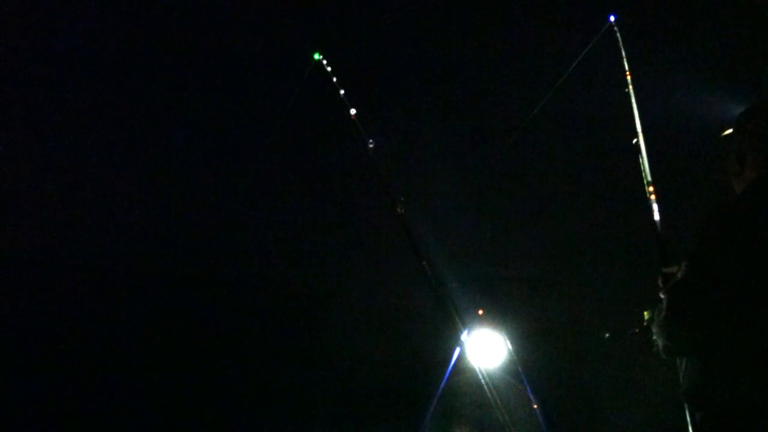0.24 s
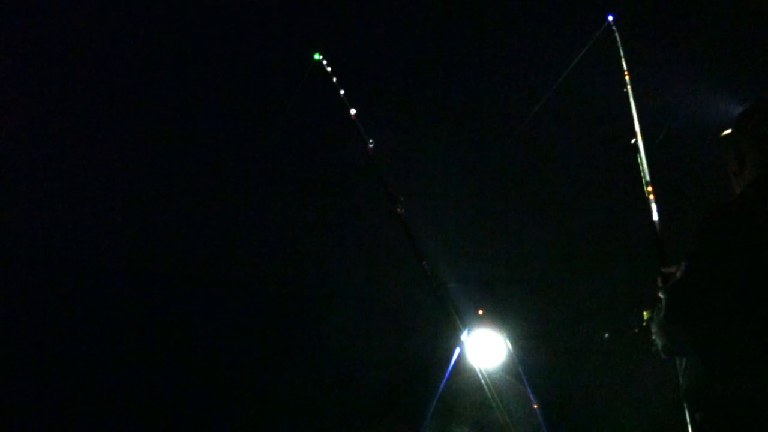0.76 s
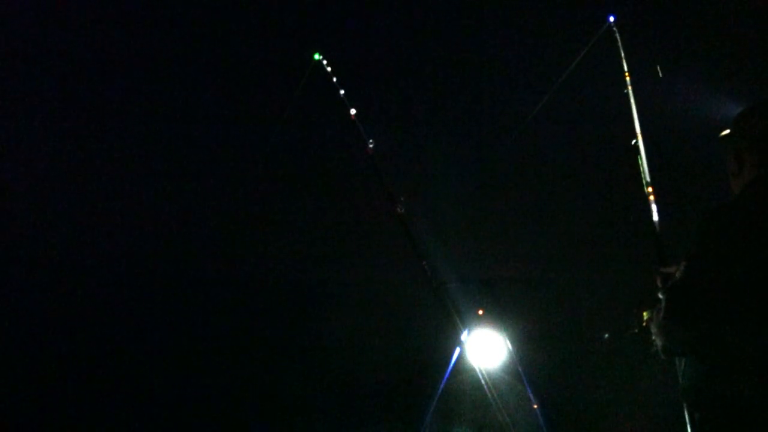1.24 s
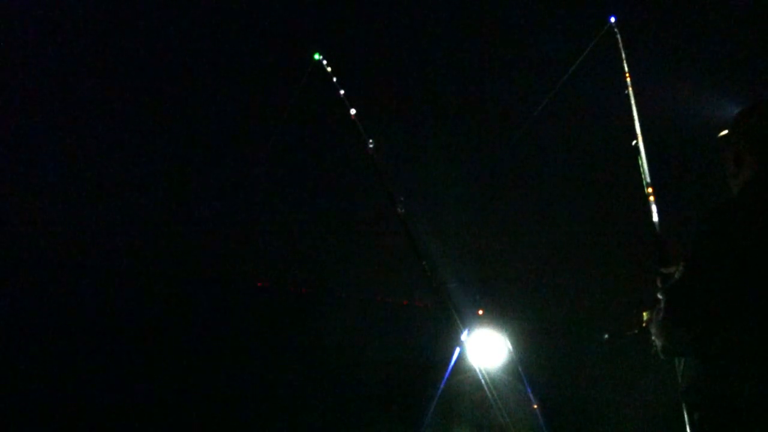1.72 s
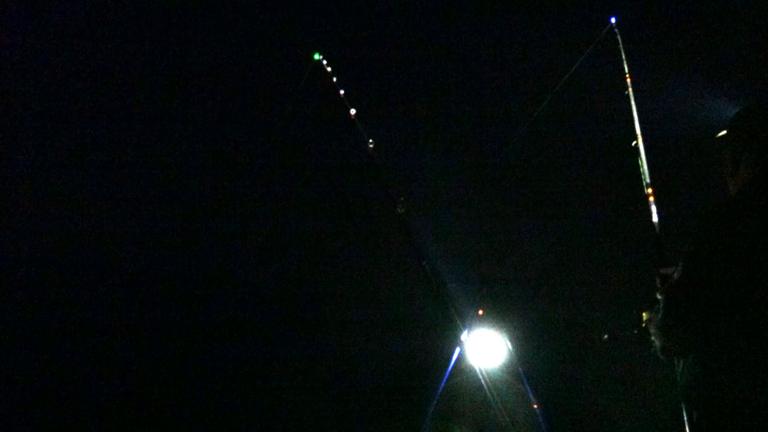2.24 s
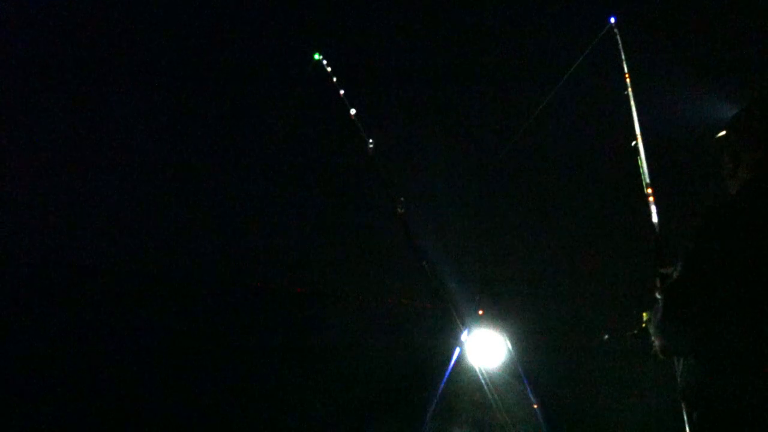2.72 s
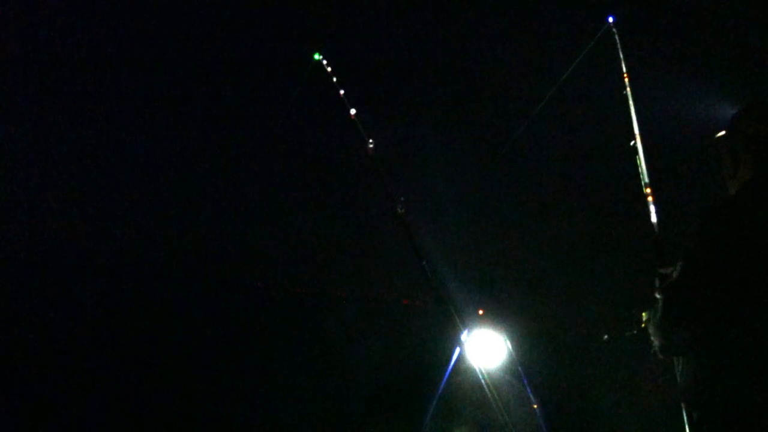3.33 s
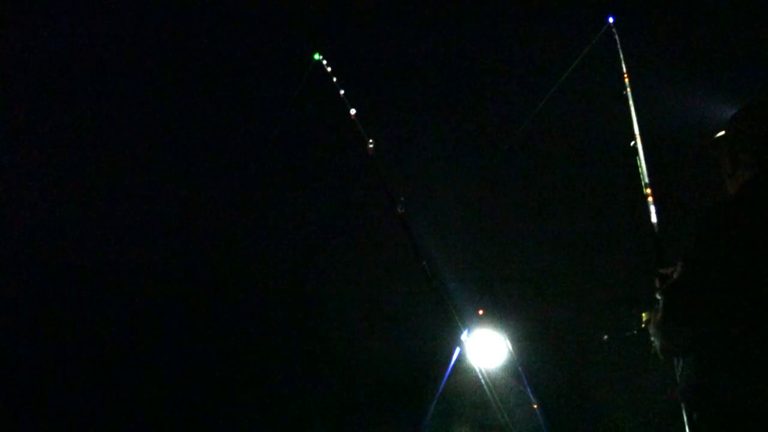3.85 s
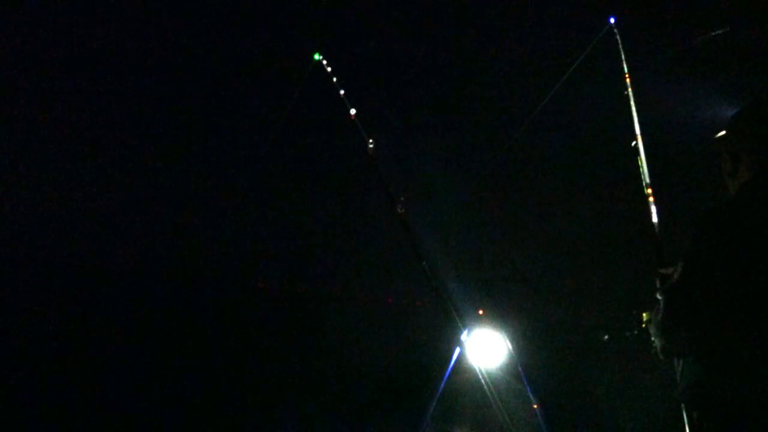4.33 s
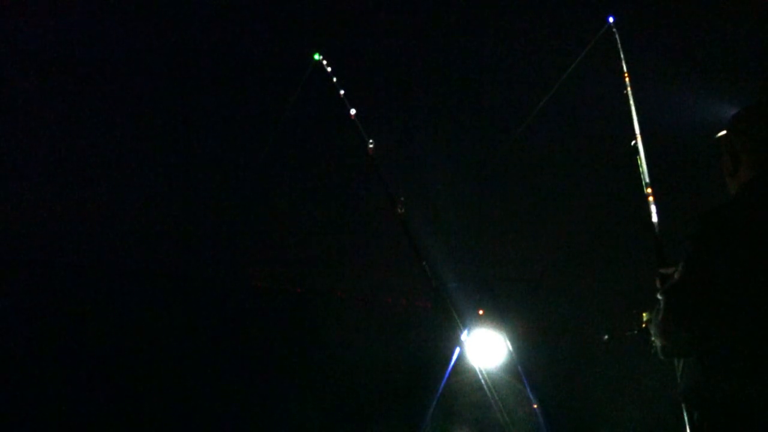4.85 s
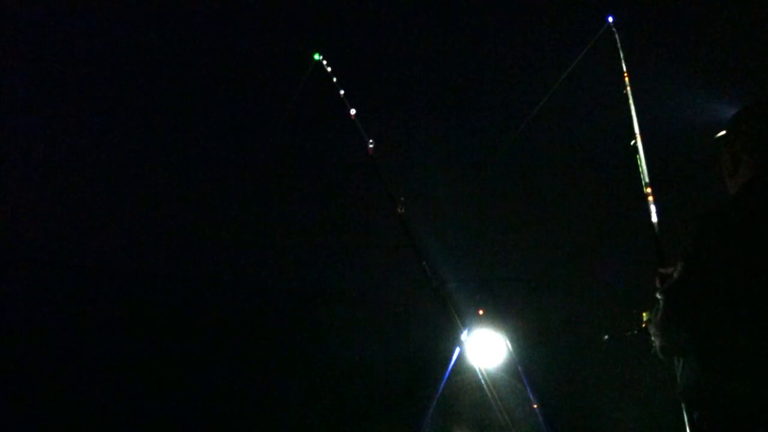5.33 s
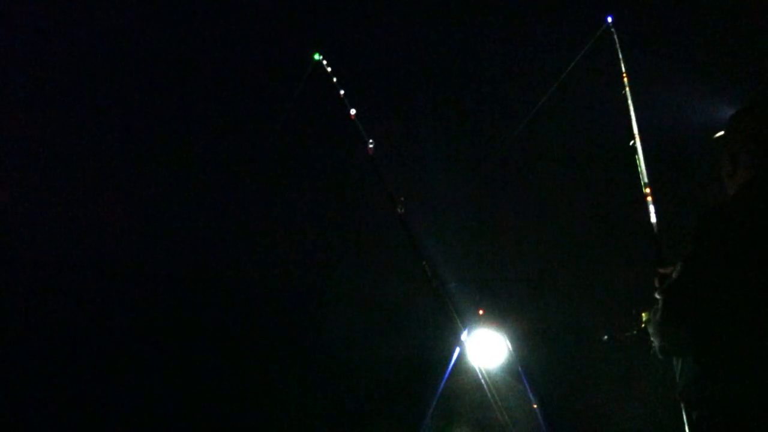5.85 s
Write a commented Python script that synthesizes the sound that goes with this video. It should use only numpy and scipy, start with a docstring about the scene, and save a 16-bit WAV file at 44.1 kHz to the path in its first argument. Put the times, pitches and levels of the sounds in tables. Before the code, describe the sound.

A small wave breaks and foams up a pebble beach. The water sinks away with dull gurgles, then drains back while stones rattle and clack together. A second wave plunges with a low boom and a burst of spray, and its foam fades to a soft wash. The shore is heard on the left only, with a very faint electronic hiss and whine on both sides.

```python
"""Small waves on a pebble beach at night.

One wave breaks, foams up the beach and drains back through rattling pebbles; the next plunges with a
boom and a burst of spray. Trapped air makes the booms, ringing bubbles the foam, and colliding stones
the rattle. The shore is heard on the left only; a faint electronic hiss and whine fill both sides."""
import sys
import numpy as np
from scipy import signal
from scipy.fft import rfft, irfft, next_fast_len
from scipy.io import wavfile
from scipy.ndimage import uniform_filter1d, map_coordinates

SR = 44100
rng = np.random.default_rng(int(sys.argv[2]) if len(sys.argv) > 2 else 0)


def generate_wav(sig):
    """Save sig (samples, or channels by samples) to the path in sys.argv[1] as 16-bit PCM at SR."""
    pcm = np.round(np.clip(np.atleast_2d(sig).T, -1, 1) * 32767).astype(np.int16)
    wavfile.write(sys.argv[1], SR, pcm)


N = 268111

# The tone of each noise, from low to high: frequency_hz, relative_level_db
BOOM_TONE = [(20, -32), (55, -27), (90, -22.5), (135, -3.5), (190, -0.5), (280, -1.5), (450, -22),
             (900, -70)]
CHURN_TONE = [(70, -45), (150, -17), (240, -7), (330, -1.5), (430, .5), (590, 0.5), (800, 1.5),
              (1400, -18.5), (4000, -70)]
FOAM_TONE = [(200, -5.5), (600, 1.5), (800, -3.5), (980, -2), (1150, -3.5), (1380, -5.5), (1600, -9.3),
             (2100, -12.5), (2800, -17), (5000, -43), (8000, -58), (13000, -68), (16000, -79)]
PEBBLE_TONE = [(400, -13.5), (1400, 5), (1900, -2.5), (2500, -1), (2900, -2.5), (3500, 1.7), (4100, -2.5),
               (4800, -13), (5800, -8), (6600, -9), (8000, -17), (11000, -46), (16000, -58)]
GRAVEL_TONE = [(400, -28), (1300, 1.5), (2400, -4), (3400, -13), (4600, -5), (5600, -1.5), (6600, -5),
               (8000, -20), (11000, -38), (16000, -52)]
COVERED_STONE_TONE = [(500, -29.5), (1200, 0), (1900, 0), (2600, 2), (3700, -2), (4900, -9.5),
                      (5700, -11.5), (6600, -21.5), (8000, -30.5), (11000, -50), (16000, -56)]
SPRAY_TONE = [(1500, -28), (4000, 7), (6000, 2), (7700, -1), (9000, -6), (10500, -12), (12200, -15),
              (14000, -22), (16000, -30)]
RUMBLE_TONE = [(20, -29), (50, -20), (66, 1.5), (100, 7.5), (150, 4.5), (300, -32), (600, -84)]
HISS_TONE = [(20, 29), (60, 15.5), (130, 10), (350, 6), (1000, 3.5), (8000, 1), (16000, -0.5)]
SLOSH_TONE = [(50, -40), (110, -18), (160, -2), (220, -1), (450, -5), (900, -35), (3000, -90)]
TRICKLE_TONE = [(800, -28), (1400, 3), (2300, 1.5), (3400, -9), (4500, -4), (5600, 0.5), (6300, -2),
                (8000, -11), (11000, -21), (16000, -45)]
SPLASH_TONE = [(700, -20), (2000, -3), (4200, 0), (5500, -4), (8000, -9), (11000, -17), (16000, -32)]

# The names of the five parts of a wave's sound: boom, churn, foam, shingle (rolling stones), spray
WAVE_PARTS = ("boom", "churn", "foam", "shingle", "spray")
# Steady surf farther along the shore, by part: level_db
DISTANT_SURF = {"boom": -78, "churn": -79, "foam": -60.5, "shingle": -79, "spray": -85.5}
# Waves breaking: start_s, boom_db, churn_db, foam_db, shingle_db, spray_db
BREAKING_WAVES = [(-0.3, -62, -42, -35, -44.5, -63), (4.124, -50.5, -32.7, -33.7, -41.3, -50)]
# How each part swells and dies when a wave breaks: attack_s, hold_s, fade_s
BREAK_TIMING = {"boom": (0.39, 0.21, 0.67), "churn": (0.34, 0.17, 0.39), "foam": (0.33, .14, 0.5),
                "shingle": (0.19, 0.32, .35), "spray": (0.15, 0.25, 0.49)}
# Water running up the beach after a break: start_s, run_up_s, churn_db, foam_db, shingle_db, spray_db
RUN_UPS = [(-0.08, .5, -51.5, -30.2, -42, -62.5), (5.05, 0.14, -61.5, -50.3, -59, -76),
           (5.29, .085, -68, -55.5, -56.5, -81)]
# How each part follows that water, timed in run-ups: hold_run_ups, fall_db_per_run_up
RUN_UP_TIMING = {"churn": (0.73, 9.2), "foam": (0.72, 6.9), "shingle": (1.28, 5.28), "spray": (2.1, 4.1)}
# Big bubbles burst first, so the foam's lowest pitch climbs as a wave ages: time_s, pitch_hz
FOAM_LOWEST_PITCH = [(0, 534), (1.4, 823), (2.6, 840), (3.8, 616), (4.5, 407), (6.08, 494)]
# Moving stones are coarse under breaking and draining water, fine under run-ups: time_s, coarse_share
STONE_MIX = [(0, 1), (1.3, 0.3), (2.2, .6), (2.6, 0.45), (3, 0.85), (4.6, 0.9), (5, 0), (6.08, 0.65)]
# Big air pockets gulping: start_s, level_db, pitch_hz
AIR_GULPS = [(.045, -42, 250), (.112, -40, 280), (1.015, -54, 380), (1.196, -51, 195), (1.265, -54, 214),
             (1.422, -48, 280), (1.448, -44.5, 165), (1.448, -42.5, 476), (1.526, -47.5, 180),
             (1.575, -49, 260), (1.598, -39.5, 210), (1.712, -50, 181), (1.79, -53, 234), (1.975, -51, 385),
             (2.2, -53, 335), (2.25, -54, 275)]
# Single stones knocking together: start_s, level_db, pitch_hz
STONE_KNOCKS = [(.6945, -26, 2070), (1.171, -25.5, 1720), (1.371, -27, 2200), (1.6645, -31, 1850),
                (1.9465, -38, 5200), (2.0965, -39, 2710), (2.115, -43, 5400), (2.218, -40.5, 4500),
                (2.2915, -40, 3020), (2.4662, -39, 5300), (2.485, -39, 1060), (2.531, -42, 5500),
                (2.546, -40, 960), (2.688, -33.5, 1700), (2.7475, -40, 4400), (2.753, -39, 4430),
                (2.860, -38, 2800), (2.978, -40, 4230), (2.991, -36, 3400), (3.024, -30.5, 2900),
                (3.078, -33.5, 3000), (3.095, -34, 4400), (3.125, -32, 2200), (3.234, -37, 1640),
                (3.275, -31, 3320), (3.313, -40, 4300), (3.392, -35, 3100), (3.466, -40, 5300),
                (3.5175, -36, 2370), (3.7533, -31.5, 2280), (3.887, -36, 1640), (3.9235, -34, 1680),
                (3.980, -37, 1890), (4.0128, -36, 3440), (5.860, -48, 4100), (5.915, -49, 5620),
                (5.9285, -46.5, 4200), (5.986, -51, 5200), (6.015, -50, 5500)]
# Fine gravel trickling after the first run-up: start_s, attack_s, hold_s, fall_db_per_s, level_db
GRAVEL_TRICKLE = (1.07, .5, 0.34, 9, -57.5)
# Spent water gurgling down between the stones, by part: attack_s, hold_s, fall_db_per_s, level_db
SINKING_GURGLE = {"boom": (0.25, 0.27, 83, -66), "churn": (0.2, 0.42, 27, -51.5)}
# Banks of pebbles giving way: start_s, hold_s, level_db
PEBBLE_SLIDES = [(2.11, .06, -59), (2.27, .03, -60), (2.43, .09, -60), (2.68, 0.1, -56.5),
                 (2.84, .05, -58.5), (2.965, 0.14, -55.5), (3.242, 0.33, -53.3), (3.6, 0.2, -55),
                 (3.81, .19, -55), (4.183, 0.18, -46)]
# The backwash (water draining back to sea) gathering speed, by part: level_db, growth_db_per_s
BACKWASH_LEVELS = {"boom": (-67, 1.6), "churn": (-60.5, 7.8), "foam": (-55.5, 4.6), "shingle": (-54.3, 0.6),
                   "spray": (-68.5, 3.3)}
# Sheets of water thrown on the stones by the curling crest: start_s, level_db
WATER_SHEETS = [(4.118, -56), (4.168, -53.5), (4.222, -49), (4.272, -45), (4.328, -45), (4.392, -45.5),
                (4.752, -53)]
# The second wave curls into a tube, whose boom sinks as it swallows more air: time_s, pitch_hz
TUBE_GLIDE = [(4.2, 220), (4.26, 190), (4.305, 141), (4.35, 85), (4.45, 78)]
# The thud and the boom of that tube caving in: attack_s, hold_s, fade_s, level_db
TUBE_COLLAPSE = {"thud": (0.04, 0.11, 0.42, -53.5), "boom": (0.03, 0.1, 0.08, -48)}
# Lumps of water slapping down in the foam: start_s, hold_s, level_db
WATER_SLAPS = [(4.295, .05, -37.5), (4.372, .045, -33), (4.886, .02, -40.5)]

GURGLE_START_S, COLLAPSE_START_S = 1.32, 4.255
BACKWASH_START_S, BACKWASH_ATTACK_S, BACKWASH_HOLD_S = 2.67, 0.24, 1.33
TOP_HZ = 15700


def amp(db):
    """Turn decibels into a gain to multiply by."""
    return 10 ** (np.asarray(db) / 20)


def unit(x):
    """Scale a signal to an average power of 1."""
    return x / np.sqrt(np.mean(x ** 2) + 1e-20)


def curve(points):
    """Join (time_s, value) points with straight lines, one value per sample."""
    return np.interp(np.arange(N) / SR, *np.transpose(points))


def wobble(rate):
    """A smooth curve through `rate` random values a second."""
    return map_coordinates(rng.standard_normal(int(N * rate / SR) + 4), [np.arange(N) * rate / SR])


def filtered(x, response):
    """Scale each frequency in x by response(hz)."""
    size = next_fast_len(N + 8192)
    return irfft(rfft(x, size) * response(np.fft.rfftfreq(size, 1 / SR)), size)[..., :N]


def coloured(x, tone):
    """Shape x with a tone table and scale it to a power of 1."""
    points_hz, db = np.transpose(tone)
    return unit(filtered(x, lambda hz: amp(np.interp(np.log(hz + 1), np.log(points_hz + 1), db))))


def rush(patchy_db):
    """White noise with louder and softer patches scattered over pitch and time."""
    spectrum = signal.stft(rng.standard_normal(N), nperseg=512)[2]
    patches = uniform_filter1d(rng.standard_normal(spectrum.shape), size=6, axis=0)
    patches = uniform_filter1d(patches, size=10, axis=1)
    return unit(signal.istft(spectrum * amp(patchy_db * unit(patches)), nperseg=512)[1][:N])


def pings(count, low_hz, high_hz, cycles, spread_db, samples, rise=0):
    """Tiny fading notes at random moments, most weak and a few strong; `rise` bends their pitch up."""
    when, pitch, strength, life = rng.random((count, 4)).T[:, :, None]
    hz = low_hz * (high_hz / low_hz) ** pitch
    turns = hz * np.arange(samples) / SR
    age = turns / (cycles * (.5 + life))
    peak = amp(-spread_db * np.log(strength + .01)) * hz / high_hz
    rings = peak * np.exp(-age) * np.sin(2 * np.pi * turns * (1 + rise * np.minimum(age, 2) / 2))
    rings[::2] *= -1
    positions = (when * N).astype(int) + np.arange(samples)
    return unit(np.bincount(positions.ravel(), rings.ravel(), N)[:N])


def add(track, start_s, sound):
    """Mix a sound into the track."""
    part = track[round(start_s * SR):][:len(sound)]
    part += sound[:len(part)]


def together(gains):
    """Combine the gains of unrelated sounds: their powers add."""
    return np.sqrt(sum(gain ** 2 for gain in gains))


def phases(start_s, attack_s, hold_s):
    """A gain that climbs from 0 to 1 over the attack, and the seconds since the hold ended."""
    t = np.arange(N) / SR - start_s
    return np.clip(t / attack_s, 0, 1), np.maximum(t - attack_s - hold_s, 0)


def crash(start_s, attack_s, hold_s, fade_s):
    """Gain of falling water: it builds, holds, then dies fast at first and lingers."""
    rise, after_s = phases(start_s, attack_s, hold_s)
    return rise / (1 + after_s / fade_s) ** 2


def flow(start_s, attack_s, hold_s, fall_db_per_s):
    """Gain of running water: it builds, holds and fades evenly."""
    rise, after_s = phases(start_s, attack_s, hold_s)
    return rise * amp(-fall_db_per_s * after_s)


def backwash(db, growth_db_per_s):
    """Gain of water draining down the slope, growing as it gathers speed."""
    age_s = np.clip(np.arange(N) / SR - BACKWASH_START_S, 0, BACKWASH_ATTACK_S + BACKWASH_HOLD_S)
    drain = flow(BACKWASH_START_S, BACKWASH_ATTACK_S, BACKWASH_HOLD_S, fall_db_per_s=65)
    return amp(db + growth_db_per_s * age_s) * drain


def collapse(part):
    """Gain of the thud or boom as the tube of air caves in."""
    *timing, db = TUBE_COLLAPSE[part]
    return amp(db) * crash(COLLAPSE_START_S, *timing)


def surf(part):
    """Gain of one part of the sound as waves break, run up, gurgle and drain."""
    gains = [amp(DISTANT_SURF[part]), backwash(*BACKWASH_LEVELS[part])]
    for start_s, *levels_db in BREAKING_WAVES:
        db = dict(zip(WAVE_PARTS, levels_db))[part]
        gains.append(amp(db) * crash(start_s, *BREAK_TIMING[part]))
    if part in RUN_UP_TIMING:
        hold, fall_db = RUN_UP_TIMING[part]
        for start_s, run_up_s, *levels_db in RUN_UPS:
            db = dict(zip(RUN_UP_TIMING, levels_db))[part]
            gains.append(amp(db) * flow(start_s, run_up_s, hold * run_up_s, fall_db / run_up_s))
    if part in SINKING_GURGLE:
        *timing, db = SINKING_GURGLE[part]
        gains.append(amp(db) * flow(GURGLE_START_S, *timing))
    return together(gains)


def aged(x, cutoff_ratio, brighten_db, note_db):
    """As big bubbles burst, the lows thin out, the top brightens and the foam's hollow note climbs."""
    hz, times, spectrum = signal.stft(x, SR, nperseg=1024)
    hz = hz[:, None] + 1
    lowest_hz = np.interp(times, *np.transpose(FOAM_LOWEST_PITCH))
    climb_octaves = np.log2(lowest_hz / 550)
    thinning = 1 / np.sqrt(1 + (cutoff_ratio * lowest_hz / hz) ** 7)
    brightening = amp(brighten_db * climb_octaves * np.clip(np.log2(hz / 1050), 0, 1))
    note_hz, width_octaves = 1130, 0.2  # where the commonest bubbles ring
    wander_octaves = .045 * np.interp(times, np.arange(N) / SR, wobble(12))
    off_note = np.log2(hz / note_hz) - .25 * np.maximum(climb_octaves, 0) + wander_octaves
    note = amp(note_db * np.exp(-(off_note / width_octaves) ** 2))
    return unit(signal.istft(spectrum * thinning * brightening * note, nperseg=1024)[1][:N])


def breakers():
    """Clouds of trapped air boom, and large bubbles churn in the tumbling crest."""
    boom = amp(0.44 * wobble(21)) * coloured(rush(patchy_db=1.9), BOOM_TONE)
    bubbles = pings(5000, low_hz=202, high_hz=911, cycles=3.2, spread_db=.7, samples=950, rise=0.095)
    churn = coloured(rush(patchy_db=0.5) + .5 * bubbles, CHURN_TONE)
    churn = aged(churn, cutoff_ratio=0.26, brighten_db=0, note_db=-1)
    return together([surf("boom"), collapse("boom")]) * boom + surf("churn") * churn


def rumble():
    """The open sea and the backwash rumble low; then the tube of air caves in with a deep thud."""
    open_sea = amp(-84.5)
    undertow = backwash(db=-78, growth_db_per_s=4.5)
    gain = together([open_sea, undertow, collapse("thud")])
    return gain * coloured(rng.standard_normal(N), RUMBLE_TONE)


def foam():
    """Small bubbles seethe up the beach, and lumps of water slap down among them."""
    bubbles = pings(9000, low_hz=702.6, high_hz=2240, cycles=3.8, spread_db=0.9, samples=400, rise=0.057)
    seethe = coloured(rush(patchy_db=.5) + 0.25 * bubbles, FOAM_TONE)
    seethe = aged(seethe, cutoff_ratio=0.95, brighten_db=8.5, note_db=3.1)
    slaps = [amp(db) * crash(start_s, attack_s=0.014, hold_s=hold_s, fade_s=0.025)
             for start_s, hold_s, db in WATER_SLAPS]
    return together([surf("foam"), *slaps]) * seethe


def shingle():
    """Countless stones hiss as they roll under water, and clack when thin foam or backwash bares them."""
    foam_db, cover_db = 20 * np.log10(surf("foam")), -42  # foam this loud covers the stones
    drain = backwash(db=0, growth_db_per_s=0)
    bare_share = np.clip(0.2 * (cover_db - foam_db) + 0.38 * drain, 0.12, 0.73)
    coarse_share = curve(STONE_MIX)
    clacks = pings(9000, low_hz=1294, high_hz=4900, cycles=3, spread_db=3, samples=220)
    jostle = amp(2.5 * wobble(330))  # hits bunch into millisecond bursts
    hits = jostle * (clacks + 0.9 * rng.standard_normal(N))
    pebbles = coarse_share * coloured(hits, PEBBLE_TONE)
    gravel = (1 - coarse_share) * coloured(hits, GRAVEL_TONE)
    covered = coloured(rush(patchy_db=0.88), COVERED_STONE_TONE)
    stones = np.sqrt(bare_share) * (pebbles + gravel) + np.sqrt(1 - bare_share) * covered
    tumble = amp(1.3 * bare_share * wobble(45))  # bare stones tumble in little groups
    slides = [amp(db) * flow(start_s, attack_s=0.015, hold_s=hold_s, fall_db_per_s=140)
              for start_s, hold_s, db in PEBBLE_SLIDES]
    return together([surf("shingle"), *slides]) * tumble * stones


def spray():
    """Droplets fizz down on the water and the stones."""
    drops = pings(9000, low_hz=5930, high_hz=13100, cycles=0.78, spread_db=3.5, samples=60)
    flicker = amp(0.6 * wobble(30))
    return surf("spray") * flicker * coloured(rush(patchy_db=1.3) + 0.7 * drops, SPRAY_TONE)


def electronics():
    """Electronics hiss faintly on both sides, with a thin buzzing whine."""
    hiss = np.array([coloured(rng.standard_normal(N), HISS_TONE) for _ in range(2)])
    whine_hz, t = 470, np.arange(N) / SR
    whine = sum(amp(-.7 * k) * np.sin(2 * np.pi * whine_hz * k * t + rng.uniform(0, 2 * np.pi))
                for k in range(1, 11))
    return amp(-76) * hiss + amp(-88.5) * unit(whine)


def gulps():
    """Air pockets close between the stones with a dull slosh and a low, rising note."""
    out, t = np.zeros(N), np.arange(SR // 4) / SR
    slosh = coloured(rng.standard_normal(N), SLOSH_TONE)
    swell = (1 - np.exp(-t / 0.013)) * amp(-60 * t / 0.15)
    for start_s, db, hz in AIR_GULPS:
        ring = np.sin(2 * np.pi * hz * t * (1 + t))
        water = slosh[round(start_s * SR):][:len(t)]
        add(out, start_s, amp(db) * swell * (ring + .5 * water))
    return out


def knocks():
    """Stones knock together: each knock rings at its own pitch with a fainter, higher second mode, over a crack
    that is duller for big stones."""
    out, t = np.zeros(N), np.arange(1024) / SR
    ring_cycles, crack_s = 19, .0065  # how long each takes to fade by 60 dB
    for start_s, db, hz in STONE_KNOCKS:
        main_mode = np.sin(2 * np.pi * hz * t)
        upper_mode = .38 * np.sin(2 * np.pi * 1.27 * hz * t)
        ring = (main_mode + upper_mode) * amp(-60 * t * hz / ring_cycles)
        low_pass = signal.butter(2, min(2.3 * hz, TOP_HZ), fs=SR)
        crack = signal.lfilter(*low_pass, rng.standard_normal(len(t)) * amp(-60 * t / crack_s))
        add(out, start_s, amp(db) * (ring + 0.38 * crack))
    return filtered(out, lambda hz: hz / (hz + 700) / (1 + (hz / 7000) ** 6))  # soften lows and highs


def trickle():
    """Fine gravel ticks and sifts as the spent water sinks away."""
    *timing, db = GRAVEL_TRICKLE
    ticks = pings(9000, low_hz=1200, high_hz=6000, cycles=1.3, spread_db=2.6, samples=140)
    gain = amp(db + 1.2 * wobble(40)) * flow(*timing)
    return gain * coloured(ticks + 0.54 * rng.standard_normal(N), TRICKLE_TONE)


def splashes():
    """Each sheet of water shatters into a short, spattering burst of drops."""
    drops = pings(12000, low_hz=2000, high_hz=9000, cycles=1.2, spread_db=2.5, samples=80)
    bursts = [amp(db) * crash(start_s, attack_s=.006, hold_s=.012, fade_s=.02)
              for start_s, db in WATER_SHEETS]
    return together(bursts) * coloured(drops + .7 * rng.standard_normal(N), SPLASH_TONE)


def tube():
    """Air rolled up by the plunging crest booms at a sinking pitch, blurred by the churning water."""
    blur_hz, lowest_hz = 45, 58  # the largest air pocket sets the low limit
    phase = 2 * np.pi * np.cumsum(curve(TUBE_GLIDE)) / SR
    ring = wobble(2 * blur_hz) * np.cos(phase) + wobble(2 * blur_hz) * np.sin(phase)
    gain = amp(-46) * flow(start_s=4.19, attack_s=.08, hold_s=.04, fall_db_per_s=130)
    return filtered(gain * unit(ring), lambda hz: 1 - 1 / (1 + (hz / lowest_hz) ** 12))


def scene():
    """Put the whole shore on the left and the electronics on both sides."""
    shore = breakers() + rumble() + tube() + foam() + shingle() + trickle()
    shore += spray() + splashes() + knocks() + gulps()
    return np.array([amp(6) * shore, np.zeros(N)]) + electronics()


def record(dry):
    """Cut off the very highest treble."""
    return filtered(dry, lambda hz: hz < TOP_HZ)


dry = scene()
out = record(dry)
generate_wav(out)
```